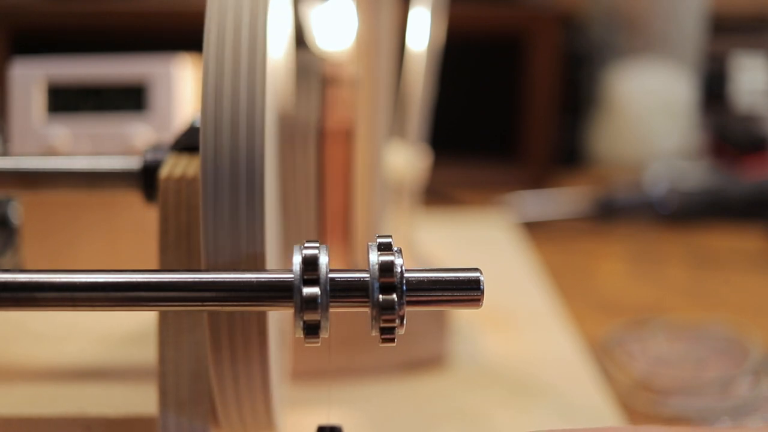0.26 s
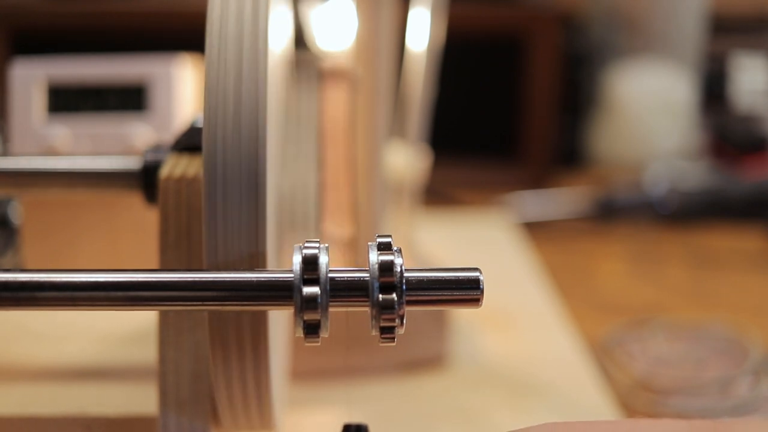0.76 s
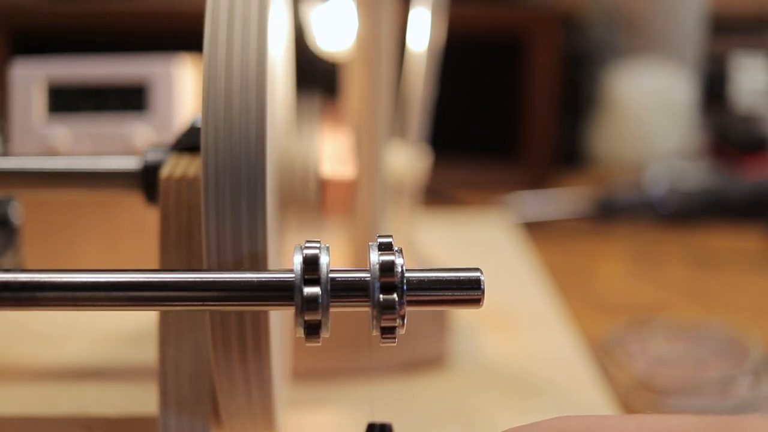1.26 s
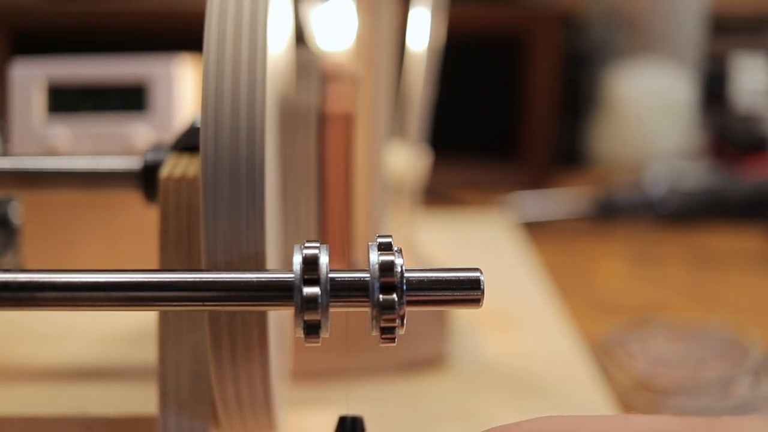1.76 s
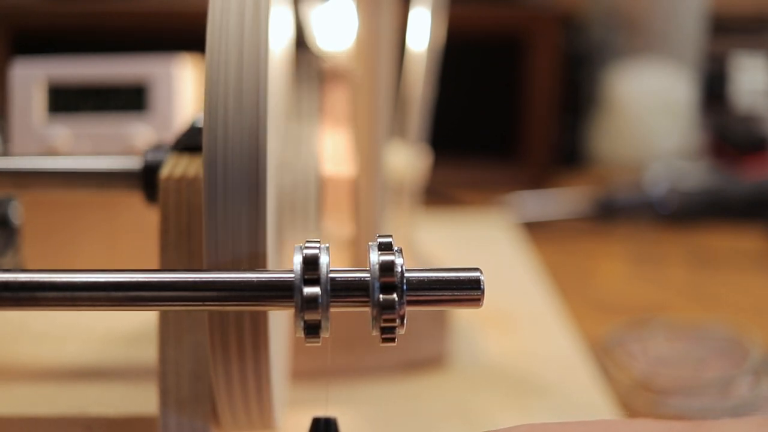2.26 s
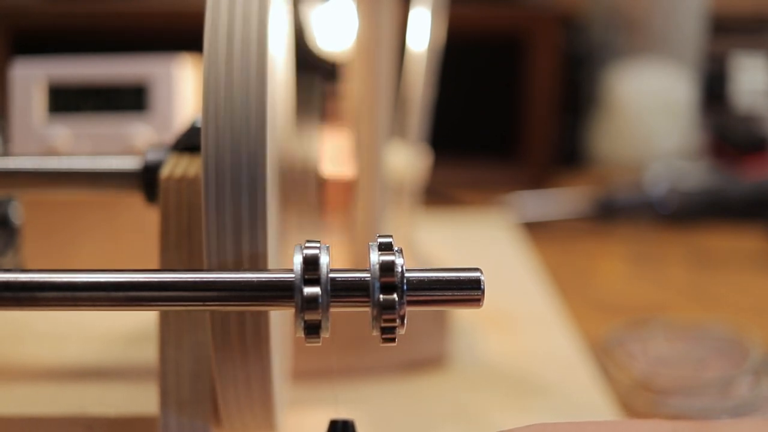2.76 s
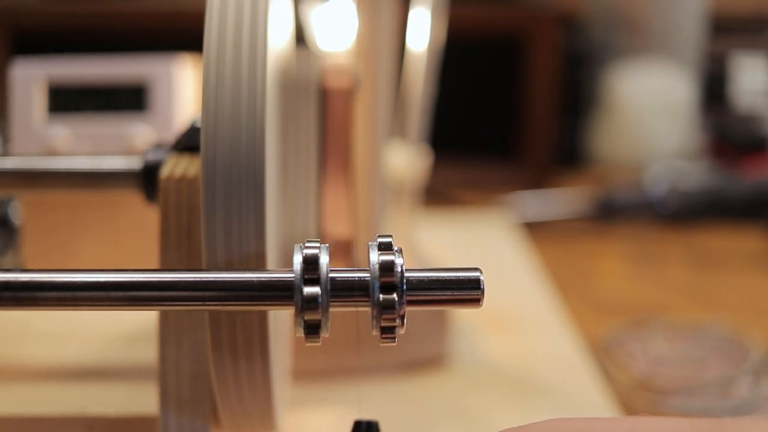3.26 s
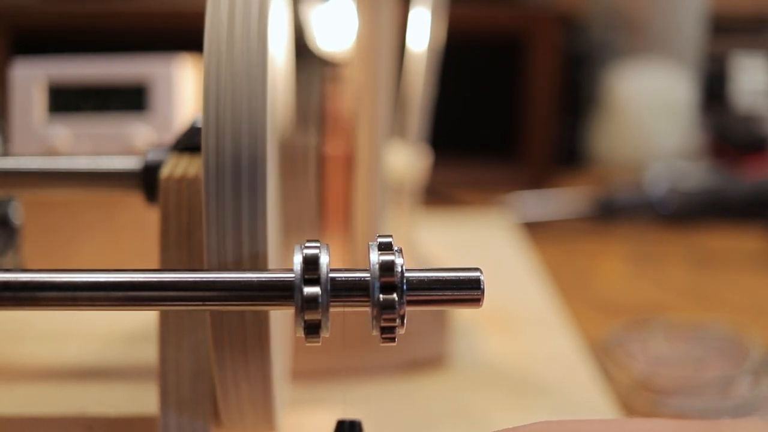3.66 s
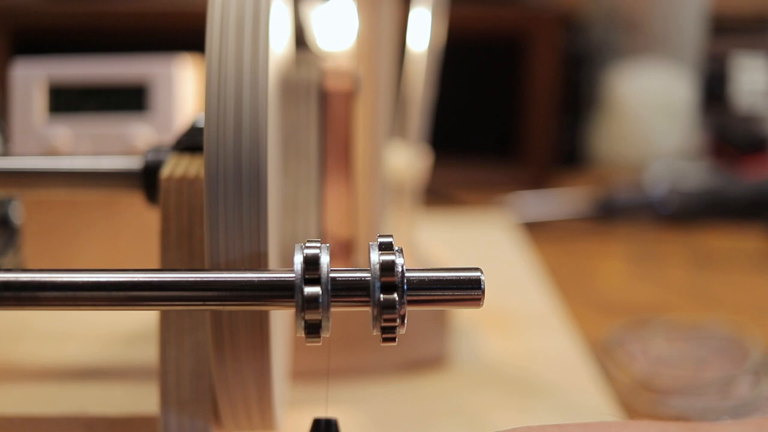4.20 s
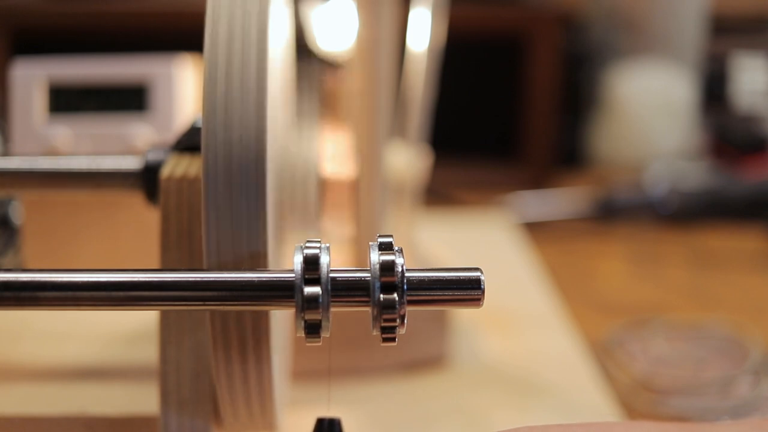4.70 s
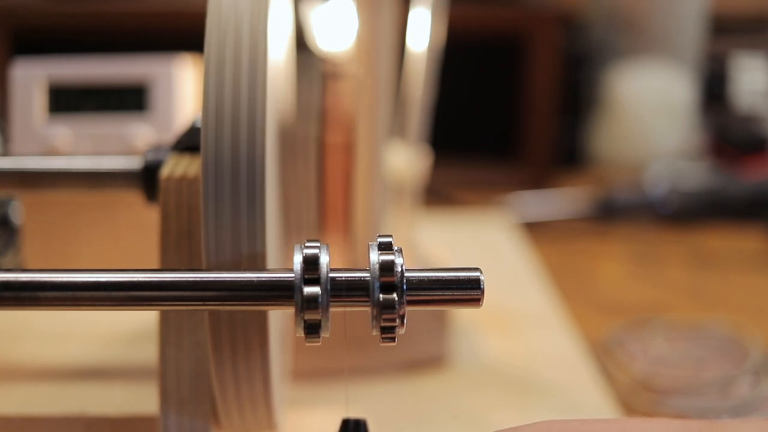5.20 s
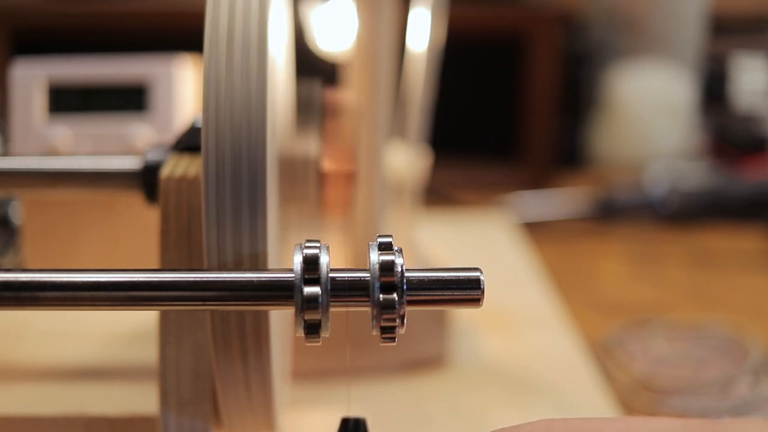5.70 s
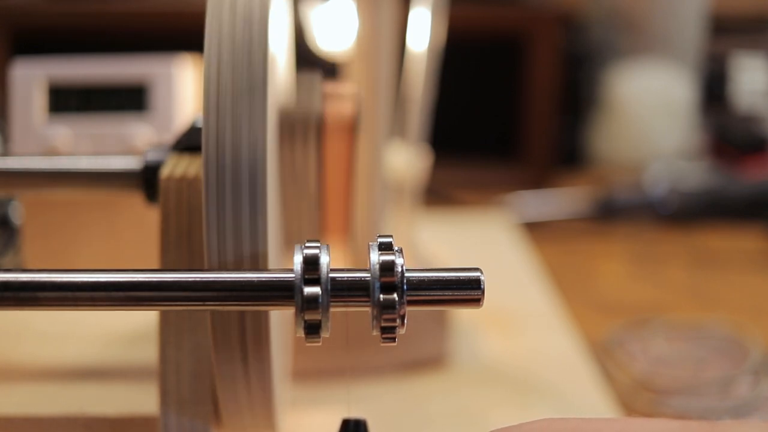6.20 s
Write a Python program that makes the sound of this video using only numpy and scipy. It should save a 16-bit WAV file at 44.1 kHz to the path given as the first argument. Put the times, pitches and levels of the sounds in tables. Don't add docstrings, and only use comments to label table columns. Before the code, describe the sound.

A continuous motor and gear whine around one kilohertz, rough with mechanical rattle, fills most of the time at unchanging speed. Wire rubbing its guide gives fast high chirps and makes a metal rod chatter, with a few sharp ticks on top. Near the end the power goes off and everything glides down and fades while separate scrapes emerge. Close microphone, small room, slight short scatter from bench and walls.

```python
import sys
import numpy as np
from scipy import signal
from scipy.fft import rfft, irfft
from scipy.io import wavfile
from scipy.ndimage import uniform_filter1d

SR = 44100
rng = np.random.default_rng(int(sys.argv[2]) if len(sys.argv) > 2 else 0)


def waveform_to_disk(signal):
    frames = np.transpose(np.atleast_2d(signal))
    scaled = np.clip(frames, -1, 1) * 32767
    samples = np.round(scaled).astype(np.int16)
    wavfile.write(sys.argv[1], SR, samples)


def boost(x):
    u = np.asarray(x, float) / 20
    return 10 ** u


N = 284443

SPOOL_RATIO = .1358
RIPPLE_HZ = 119.9
WIRE_LEAD = .435
MESH_ORDER = 11
OFF_S = 5.6

# (time [s], speed [turns/s])
SPEED = [(0, 98.31), (.9, 98.32), (1.6, 98.23), (2.1, 98.34), (2.8, 98.39), (3.2, 98.5), (4, 98.47),
         (4.6, 98.4), (5.58, 98.3), (5.64, 96), (5.75, 87.6), (5.85, 78.6), (5.97, 69.8), (6.2, 50),
         (6.31, 41), (6.45, 31)]
ORDER_DB = [-45.5, -50.5, -49.5, -60, -64, -51.5, -56.5, -62.5, -54.5, -75, -31.5, -40, -80, -48, -56,
            -64.5, -72, -65, -55, -55, -58, -64, -66, -50, -66, -42.5, -59, -67, -49, -66, -80, -47, -82,
            -49, -53, -51, -83, -47.5, -59, -42.5, -53, -79, -52, -47, -50.5, -49.5, -50.5, -46, -57, -53,
            -63, -64, -52, -67, -54.5, -54, -69, -71, -68, -53.5, -70, -63.5, -65, -75, -68, -73, -58.5,
            -74, -72, -74, -75, -60.5]
TOP_ORDER = 93
TOP_DB = [-89, -75, -57, -63.5, -82, -62]
# (half shaft orders [count], spool orders [count]), then their (level [dB rms])
SIDE = [(0, 2), (1, 0), (2, -1), (2, 1), (2, 2), (3, 1), (4, -1), (4, 1), (4, 2), (6, -1), (6, 1), (17, 0),
        (19, 0), (20, -1), (21, 0), (22, 2), (23, 0), (23, 2), (24, 1), (24, 2), (51, 0), (53, 0)]
SIDE_DB = [-72, -61, -57, -57, -56, -68, -54, -59, -56, -57, -62, -61, -61, -56, -54, -46, -43, -47, -47,
           -50, -54, -54]
# (shaft order [count], ripple order [count]), then (level [dB rms])
RIPPLE = [(0, 1), (1, 1), (36, -1), (36, 1)]
RIPPLE_DB = [-53, -56, -52, -65]
SLOTS = (48, 72)
# (unloaded [dB], further drop [dB], slowing where it drops [share])
LOWER_SLOT = (3.5, -20, .235)
# (frequency [Hz], width [Hz], gain [dB])
UPPER_SLOT_RINGS = [(3930, 260, 16), (2750, 520, 22)]
# (frequency [Hz], width [Hz], gain [dB])
MESH_RINGS = [(860, 70, 6), (755, 80, -10), (640, 90, 10), (510, 70, -9), (415, 90, 6)]
# (frequency [Hz], level [dB per Hz])
BASE = [(15, -62), (25, -38), (97, -6), (149, -17), (195, -14.5), (754, -18), (988, -10), (1100, -3.5),
        (1480, -10.5), (2610, -13.5), (3160, -20.5), (4610, -20), (5000, -24), (9320, -35.5),
        (16000, -47.5)]
# (frequency [Hz], width [Hz], gain [dB])
FRAME = [(420, 60, 3), (670, 80, 4), (860, 60, 4), (960, 60, 4), (1150, 140, 6), (1310, 70, 4),
         (2570, 130, 6), (2750, 200, 5), (2920, 120, 5), (3900, 250, 3), (4650, 300, 3), (5800, 200, 3),
         (7700, 250, 3), (8800, 700, 3), (9450, 300, 4), (10900, 100, 5), (12800, 500, 3), (14870, 150, 6),
         (15250, 900, 5), (15650, 150, 6)]
# (frequency [Hz], width [Hz], gain [dB])
NOTCH = [(156, 25, -14), (250, 10.6, -10.5), (3900, 98, -9.5), (4870, 150, -5.5), (13400, 900, 2),
         (10700, 500, -2.5)]
# (powered [dB], unloaded change [dB], change at rest [dB], wire stroke swing at rest [dB])
RATTLE = [
    (-28.5, -1, -28, 4),
    (-33.5, 0.5, -6, -4),
    (-32.5, -0.3, -11, 2),
    (-40.5, -8.5, -6, -4),
]
# (time [s], peak [dB], pitch [Hz])
SQUEAK = [(0.1301, -26.5, 8940), (0.2054, -32, 8500), (0.5382, -33, 8650), (0.9547, -36, 8760),
          (1.0645, -28, 8940), (1.1398, -33, 8750), (1.3319, -32, 8890), (1.5589, -27, 9000),
          (1.6297, -31, 8540), (2.152, -35, 8750), (2.83, -29, 8840), (3.05, -32, 8600),
          (3.2834, -32, 8460), (3.685, -31, 8680), (4.0238, -32, 8470), (4.135, -32, 8870),
          (4.2083, -30, 8870), (4.6957, -32, 8900), (4.7336, -31, 9030), (4.7706, -27, 8850),
          (4.807, -30, 8840), (5.1826, -33, 8650), (5.5982, -34, 8840), (5.7114, -30.5, 8870),
          (5.7986, -25.5, 9000), (5.8905, -30, 8620), (5.9379, -36, 8620), (6.0626, -38, 9010),
          (6.1878, -36, 8800), (6.262, -35.5, 8950)]
# (time [s], peak [dB], pitch [Hz])
CHATTER = [(0.0553, -21, 2710), (0.3127, -21, 2630), (0.3561, -23, 2750), (0.433, -22, 2570),
           (0.841, -17, 2520), (0.8783, -19, 2600), (1.1552, -15, 2520), (1.4814, -15.5, 2720),
           (1.5938, -20, 2830), (1.6277, -16.5, 2650), (1.706, -15.5, 2670), (1.737, -17.5, 2500),
           (1.8273, -17, 2540), (1.8537, -18, 2630), (1.928, -16.5, 2590), (2.0622, -18, 2770),
           (2.5097, -20, 2570), (2.9761, -16.5, 2710), (3.039, -16, 2550), (3.3149, -22, 2700),
           (3.4845, -18, 2740), (3.5748, -20.5, 2760), (4.0523, -19, 2450), (4.4598, -16, 2590),
           (4.6427, -19, 2500), (4.6956, -21, 2520), (4.997, -24, 2740), (5.1307, -21, 2630),
           (5.2123, -19, 2520), (5.355, -20, 2540)]
# (time [s], peak [dB], pitch [Hz])
CHATTER_COASTING = [(5.5978, -20, 2880), (5.6322, -30, 2810), (5.6487, -20, 2580), (5.6726, -30, 2670),
                    (5.713, -38, 2920), (5.7385, -32, 2880), (5.7824, -26, 2620), (5.8073, -30, 2600),
                    (5.8462, -29, 2610), (5.8666, -23, 2570), (5.8866, -27, 2640), (5.943, -17.5, 2580),
                    (5.9939, -32, 2910), (6.0273, -28, 2650), (6.0597, -31, 2900), (6.1196, -23.5, 2820),
                    (6.1498, -17.5, 2540), (6.178, -19.5, 2490), (6.2249, -20.5, 2550), (6.2503, -25, 2800),
                    (6.2992, -23.5, 2660), (6.3107, -28, 2570), (6.3475, -27, 2710), (6.372, -29, 2560),
                    (5.925, -27, 3930), (6.095, -30, 3900), (6.13, -29, 3880), (6.325, -31, 3900),
                    (6.401, -26, 2780), (6.4304, -25, 2740)]
# (place [strokes], scatter [s], mean [dB], scatter [dB], pitch [Hz], scatter [Hz])
SQUEAK_RULE = (0.5, .002, -36, 2.2, 8760, 190)
CHATTER_RULE = (.45, .003, -22.5, 2, 2660, 120)
# (start [s], length [s], pitch [Hz], sag [share])
LAST_SLIP = (6.414, 0.054, 2930, 0.31)
LAST_SLIP_DB = [-37, -38, -52, -58]
# (time [s], peak [dB])
TICKS = [(0.3282, -30), (0.636, -29), (0.8612, -23), (1.0645, -28), (2.0617, -24), (2.2852, -26),
         (2.7526, -27), (2.8953, -34), (3.693, -29), (3.9085, -30), (4.2887, -35), (4.4593, -25),
         (4.669, -23.5), (5.3537, -26)]


def level(x, db):
    return x * boost(db) / np.sqrt(np.mean(x ** 2))


def walk(rate):
    count = int(N / SR * rate) + 2
    return np.interp(np.arange(N) * rate / SR, np.arange(count), rng.standard_normal(count))


def lost(seconds):
    return 1 - np.exp(-np.maximum(np.arange(N) / SR - OFF_S, 0) / seconds)


def rings(hz, table):
    return sum(db / (1 + (2 * (hz - f) / width) ** 2) for f, width, db in table)


def frame_db(hz):
    base_hz, base_db = np.transpose(BASE)
    return np.interp(np.log(hz), np.log(base_hz), base_db) + rings(hz, FRAME + NOTCH)


def coloured(x, lo_hz, hi_hz):
    hz = np.fft.rfftfreq(N, 1 / SR) + 1
    edge = 1 / np.sqrt((1 + (lo_hz / hz) ** 20) * (1 + (hz / hi_hz) ** 20))
    return level(irfft(rfft(x) * boost(frame_db(hz)) * edge, N), 0)


def shaft_speed():
    s, turns_per_s = np.transpose(SPEED)
    return np.interp(np.arange(N) / SR, s, turns_per_s)


def room_scatter(dry):
    age = np.arange(SR // 4) / SR
    tail = rng.standard_normal(SR // 4) * np.exp(-np.log(1000) * age / 0.34)
    return signal.fftconvolve(dry, tail / np.sqrt(np.sum(tail ** 2)))[:N]


def ticks():
    out, age = np.zeros(N + SR), np.arange(SR // 40) / SR
    for s, db in TICKS:
        start = int(s * SR)
        out[start:start + len(age)] += boost(db) * rng.standard_normal(len(age)) * np.exp(-age / .002)
    out = coloured(out[:N], 1600, 9000)
    loudest_db = np.max(TICKS, axis=0)[1] + 9
    return out * boost(loudest_db) / np.abs(out).max()


def strokes(speed, turns, rule, accents, until_s):
    place, scatter_s, db, scatter_db, hz, scatter_hz = rule
    travel = 2 * SPOOL_RATIO * turns - 0.46 * (1 - speed / speed[0])
    chance = rng.standard_normal((int(travel[-1]), 3))
    s = np.interp(np.arange(len(chance)) + place, travel, np.arange(N) / SR)
    rows = np.array([s, 0 * s + db, 0 * s + hz]).T
    rows = rows + chance * [scatter_s, scatter_db, scatter_hz]
    free = np.abs(s[:, None] - np.array(accents)[:, 0]).min(axis=1) > .018
    return accents + rows[free & (s < until_s)].tolist()


def chirp(hz, length, sag, rough):
    wobble = uniform_filter1d(rng.standard_normal(length), 40)
    pitch = hz * (1 + sag / 2 - sag * np.arange(length) / length + rough * wobble)
    return 2 * np.pi * np.cumsum(pitch) / SR


def squeaks(speed, slips):
    out = np.zeros(N + SR)
    for s, db, hz in slips:
        start = int((s - .004) * SR)
        length = int(SR * 1.5 / speed[start])
        tone = np.sin(chirp(hz, length, sag=0.037, rough=0.12 + 0.17 * (1 - speed[start] / speed[0])))
        swell = np.sin(np.pi * (np.arange(length) / length) ** .7) ** 2
        out[start:start + length] += boost(db - 7.0) * tone * swell
    return out[:N]


def last_slip():
    out = np.zeros(N + SR)
    s, seconds, hz, sag = LAST_SLIP
    start, length = int(s * SR), int(seconds * SR)
    phase = chirp(hz, length, sag, rough=0.13)
    swell = np.sin(np.pi * np.arange(length) / length)
    for k, db in enumerate(LAST_SLIP_DB):
        out[start:start + length] += boost(db) * np.sin((k + 2) * phase) * swell ** (k + 1.7)
    return out[:N]


def chatter(speed, jumps):
    out, length = np.zeros(N + SR), 1500
    age = np.arange(length) / SR
    for s, db, hz in jumps:
        start = max(int((s - .0015) * SR), 0)
        hold_s = 0.007 + 0.01 * (1 - speed[start] / speed[0])
        shape = (1 - np.exp(-age / 0.0024)) * np.exp(-(age / hold_s) ** 2)
        tone = np.sin(chirp(hz, length, sag=0.089, rough=0.095))
        out[start:start + length] += boost(db - 1.5) * shape * tone
    return out[:N]


def grit(spread_db):
    return rng.standard_normal(N) * boost(spread_db * walk(900))


def load(speed, turns):
    slow = np.maximum(1 - speed / speed[0], 0)
    stroke = np.cos(2 * np.pi * (2 * SPOOL_RATIO * turns + WIRE_LEAD))
    jolt_db = 0.5 * np.exp(-((np.arange(N) / SR - OFF_S) / 0.019) ** 2)
    levels = []
    for db, off_db, rest_db, swing_db in RATTLE:
        coasting_db = off_db * lost(.061) + rest_db * slow ** 1.86 + swing_db * slow ** 2 * stroke
        levels.append(db + jolt_db + coasting_db + 2.37 * walk(1.198))
    return levels


def rattle(speed, turns):
    mesh_db, guide_db, motor_db, bench_db = load(speed, turns)
    slow = 1 - speed / speed[0]
    shaft, spool = 2 * np.pi * turns, 2 * np.pi * SPOOL_RATIO * turns
    stroke = np.cos(2 * spool + 2 * np.pi * WIRE_LEAD)

    mesh = grit(2.7) * boost(1.7 * np.cos(shaft - 1.8) + 0.3 * np.cos(shaft / 2) + 0.12 * np.cos(spool))
    guide = grit(1.9) * boost(0.84 * np.cos(shaft + 1.5) + 1.4 * stroke + 1.1 * walk(30))
    motor = grit(2.55) * boost(1.1 * np.cos(2 * shaft) + (0.26 + 1.4 * slow) * stroke)
    brush = grit(1.4) * boost(1.4 * np.cos(shaft + 0.56) + (1.0 + 3.4 * slow) * stroke)
    bench = grit(1.1) * boost(0.91 * np.cos(spool + 0.76))
    housing = guide
    for _ in range(3):
        housing = coloured(housing, 3990, 3830)

    out = boost(mesh_db - 12.5 + 8 * slow) * coloured(mesh, 500, 842)
    out += boost(mesh_db - 6.0 - 9.2 * slow) * coloured(mesh, 865, 1443)
    out += boost(mesh_db - 9.0 - 1.4 * slow) * coloured(mesh, 1624, 2440)
    out += boost(guide_db - 2.5 - 2.0 * slow) * coloured(guide, 2300, 3300)
    out += slow * boost(guide_db - 9 + 3 * walk(28)) * housing
    out += boost(motor_db - 3.0 - 0.75 * slow) * coloured(motor, 3070, 7980)
    out += boost(motor_db - 16.0 - .3 * slow) * coloured(brush, 8340, 11160)
    out += boost(motor_db - 23.5 - .3 * slow + 4.5 * slow * stroke) * coloured(grit(1.6), 11400, 25000)
    out += boost(bench_db - 4.5) * coloured(bench, 144, 475)
    out += boost(bench_db - 13.5 - 11 * slow) * coloured(bench, 22, 167)
    return out


def tone_fades(speed, turns):
    slow = np.maximum(1 - speed / speed[0], 0)
    heavy = (1 + np.cos(2 * np.pi * (SPOOL_RATIO * turns - .28))) / 2
    unloaded, field_lost = lost(.061), lost(.32)
    mesh_off_db = -3.0 - 7 * heavy ** 2 + rings(MESH_ORDER * speed, MESH_RINGS)
    mesh = -24 * slow ** 2 + unloaded * mesh_off_db
    off_db, drop_db, share = LOWER_SLOT
    lower = off_db * unloaded + drop_db / (1 + np.exp((share - slow) / .015))
    upper = -7 * field_lost + rings(SLOTS[1] * speed, UPPER_SLOT_RINGS)
    return mesh, lower, upper, -18 * field_lost


def whine(speed, turns):
    lines = [(k + 1, 0, db) for k, db in enumerate(ORDER_DB)]
    lines += [(TOP_ORDER + k, 0, db) for k, db in enumerate(TOP_DB)]
    lines += [(half / 2 + spool * SPOOL_RATIO, 0, db) for (half, spool), db in zip(SIDE, SIDE_DB)]
    lines += [(order, ripple, db) for (order, ripple), db in zip(RIPPLE, RIPPLE_DB)]
    mesh_db, *slot_db, current_db = tone_fades(speed, turns)
    slot_db = dict(zip(SLOTS, slot_db))
    seconds, coarse, out = np.arange(N) / SR, np.arange(0, N, 256), 0
    slack = 1 + 45 * (1 - speed / speed[0])
    for order, ripple, db in lines:
        hz = order * speed[coarse] + ripple * RIPPLE_HZ
        lift_db = np.interp(np.arange(N), coarse, 0.39 * (frame_db(hz) - frame_db(hz[0])))
        fade_db = mesh_db if abs(order - MESH_ORDER) < .3 else slot_db.get(order, current_db)
        if 0 < order <= 2:
            fade_db = fade_db * .9
        cycles = order * turns + ripple * RIPPLE_HZ * seconds + rng.random() + 0.016 * slack * walk(45)
        if order == MESH_ORDER:
            cycles = cycles + (.1 + .0015 * (slack - 1)) * np.sin(2 * np.pi * SPOOL_RATIO * turns)
        waver_db = 1.1 * walk(7) + 0.11 * (slack - 2.5) * walk(30)
        out = out + boost(db + lift_db + fade_db + waver_db) * np.sin(2 * np.pi * cycles)
    return np.sqrt(2) * out


def scene():
    speed = shaft_speed()
    turns = np.cumsum(speed) / SR
    slips = strokes(speed, turns, SQUEAK_RULE, SQUEAK, LAST_SLIP[0])
    jumps = strokes(speed, turns, CHATTER_RULE, CHATTER + CHATTER_COASTING, OFF_S)
    dry = ticks() + squeaks(speed, slips) + last_slip() + chatter(speed, jumps) + rattle(speed, turns)
    return (dry + boost(-14) * room_scatter(dry) + whine(speed, turns))[None]


def band_limit(x):
    return signal.sosfilt(signal.butter(12, 16650, fs=SR, output="sos"), x)


def record(dry):
    hz = np.fft.rfftfreq(N, 1 / SR)
    mix = irfft(rfft(dry) * (hz < 15730), N)
    return band_limit(mix)


dry = scene()
out = record(dry)
waveform_to_disk(out)
```